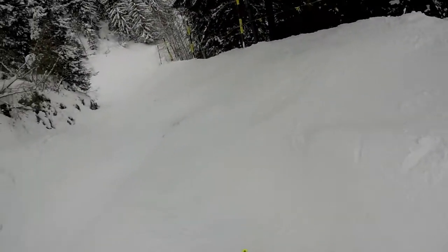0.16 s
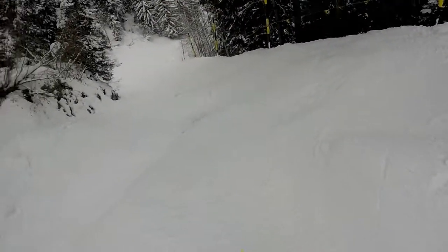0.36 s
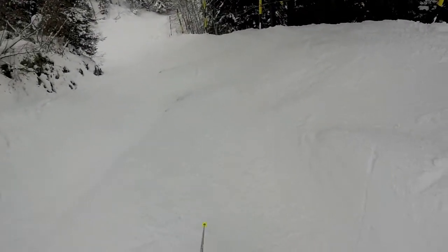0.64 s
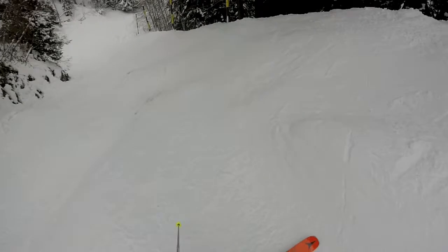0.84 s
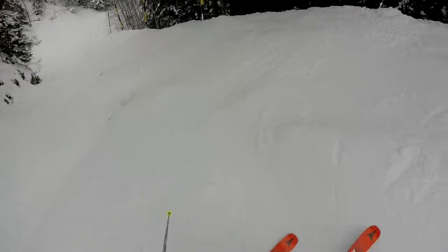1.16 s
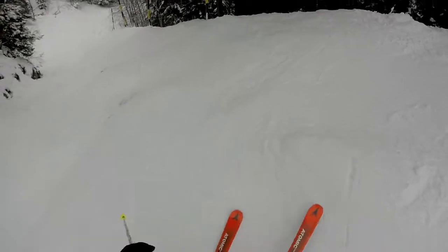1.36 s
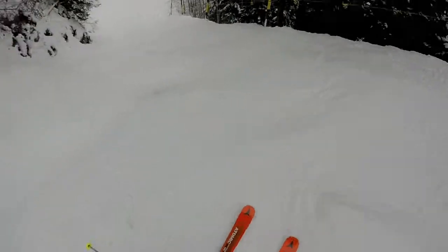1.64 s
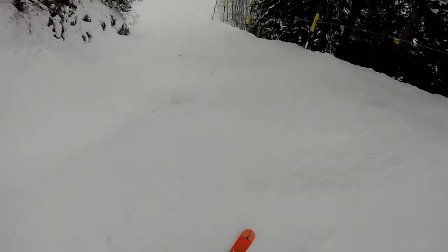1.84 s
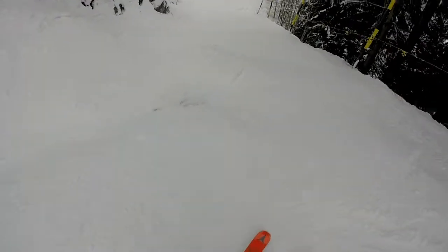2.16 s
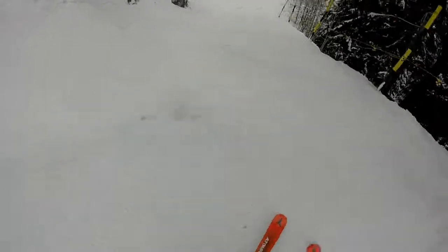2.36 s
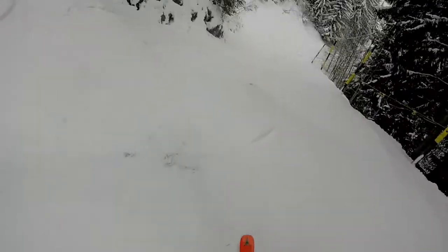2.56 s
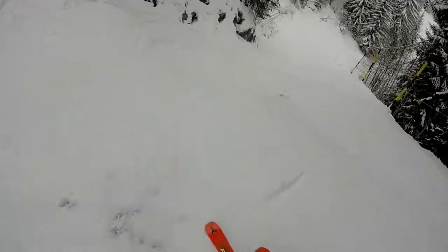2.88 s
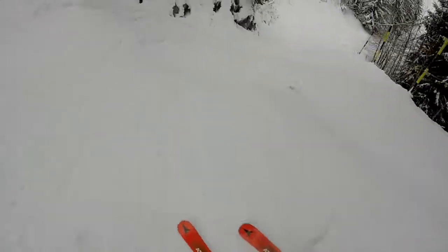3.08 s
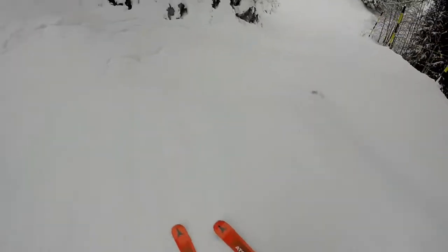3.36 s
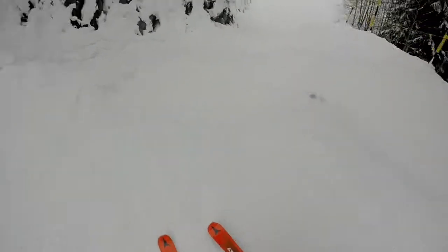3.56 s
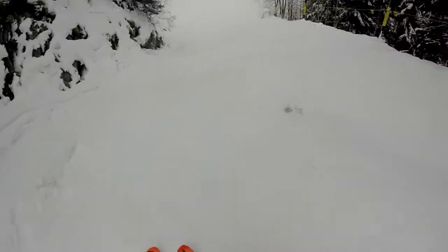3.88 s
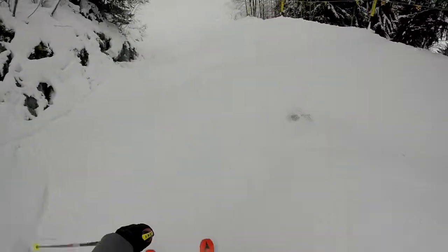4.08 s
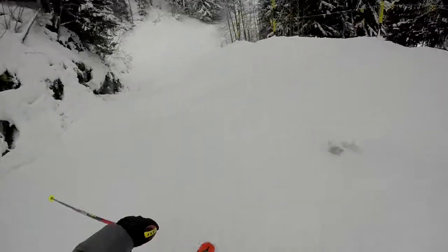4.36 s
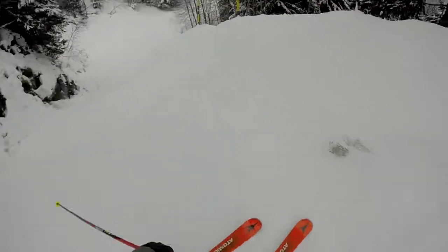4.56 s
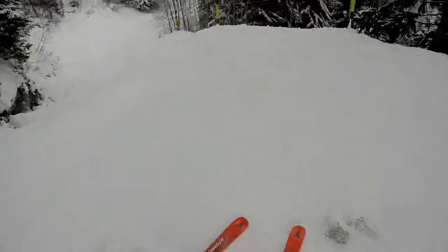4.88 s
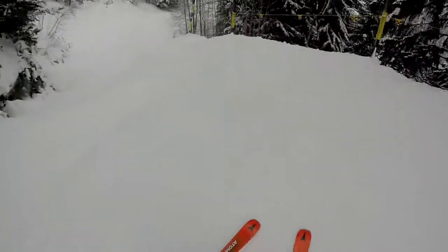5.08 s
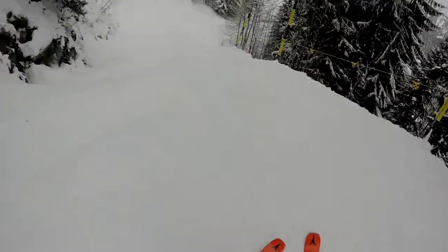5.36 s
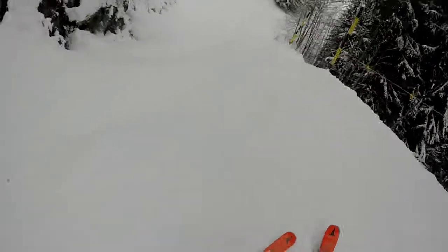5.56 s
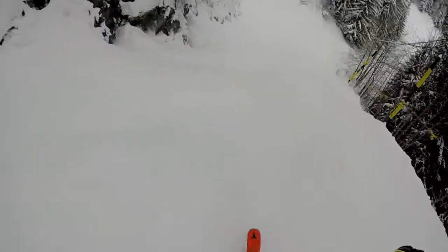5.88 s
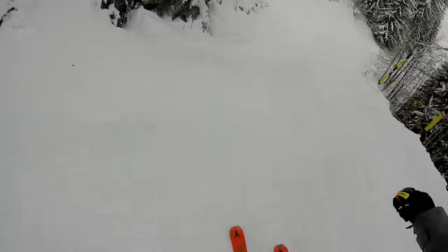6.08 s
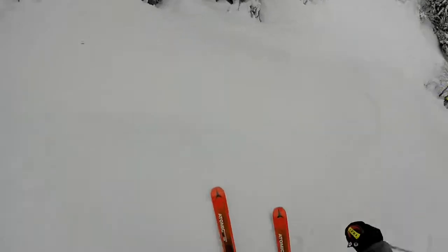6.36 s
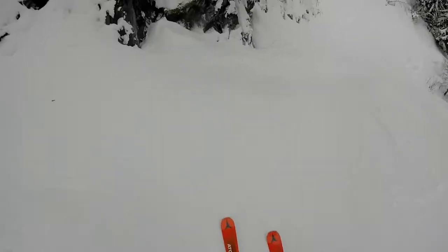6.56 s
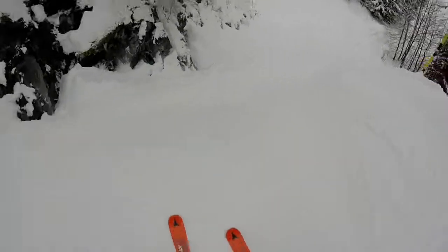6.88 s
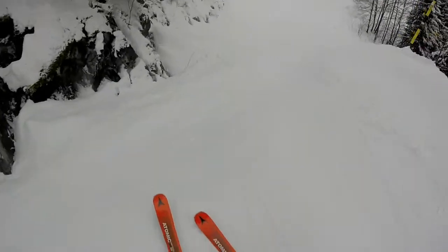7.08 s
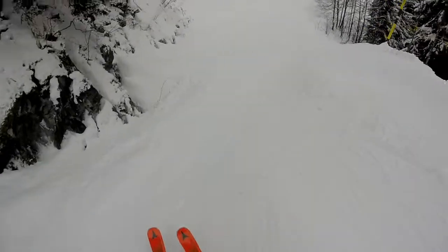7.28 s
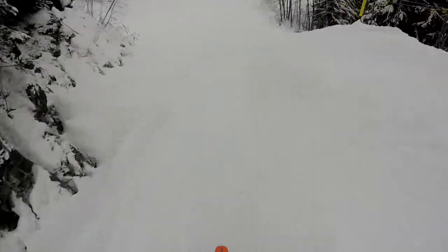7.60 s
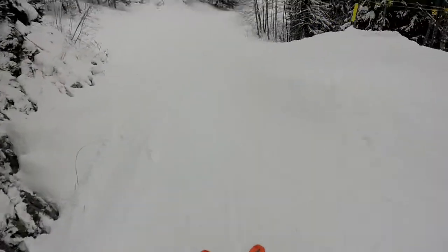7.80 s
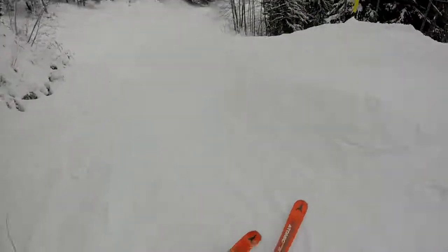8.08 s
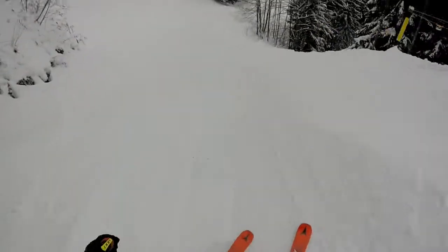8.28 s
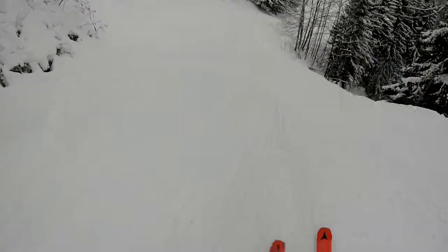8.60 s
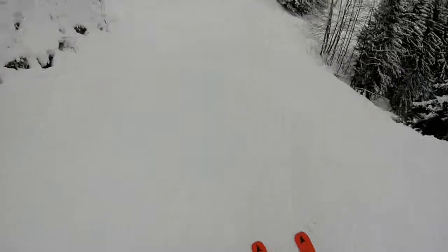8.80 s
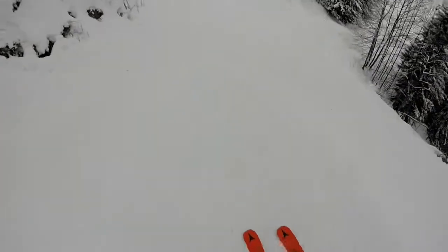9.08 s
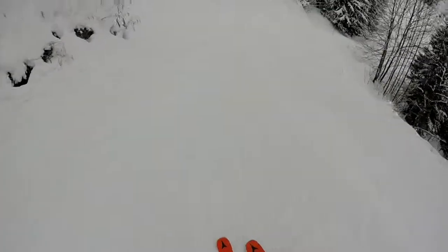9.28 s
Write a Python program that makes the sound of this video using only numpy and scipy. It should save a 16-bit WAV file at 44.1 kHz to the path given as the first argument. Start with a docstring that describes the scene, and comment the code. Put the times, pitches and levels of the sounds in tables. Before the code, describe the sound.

Close, boxy sound of skiing outdoors: short bursts of hissing snow spray between softer gliding, while the shaking camera mount flutters and rumbles very low. The start is quiet, with a faint sliding moan. Knocks and dull clacks follow near 2.7, 4.4 and 6.6 seconds. Deep thumps jolt the microphone around 6.3 and strongest at 7.7 seconds with clustered ticks, then strong swishes and more rumble close it.

```python
"""Snow swishes under skis gliding down a soft slope, gear ticks, and a deep rumble thumps at every bump.
The microphone sits shut inside a small plastic camera housing on a shaking mount.
Swish, ticks and rushing air are noise and clicks through the housing's resonances; the mount adds
low noise bands and short pulses. Clacks ring by themselves; a soft moan is sliding noise bands."""
import sys
import numpy as np
from scipy import signal
from scipy.fft import rfft, irfft
from scipy.io import wavfile
from scipy.ndimage import uniform_filter1d

SR = 44100
rng = np.random.default_rng(int(sys.argv[2]) if len(sys.argv) > 2 else 0)


def wav_out(sig):
    """Save sig, one row per channel (or a flat mono array), as 16-bit PCM at SR to the path in sys.argv[1]."""
    wavfile.write(sys.argv[1], SR, np.round(np.clip(np.atleast_2d(sig).T, -1, 1) * 32767).astype(np.int16))


N = 416304


def from_db(db):
    """Decibels to gain."""
    return 10 ** (np.asarray(db) / 20)


def rms_one(x):
    """Scale to unit rms."""
    return x / np.sqrt(np.mean(x ** 2) + 1e-20)


def in_time(rows):
    """Columns of a curve table, one value per sample."""
    start_s, *columns = np.transpose(rows)
    return [np.interp(np.arange(N) / SR, start_s, column) for column in columns]


def drift(rate_hz):
    """Slow chance with spread 1: noise through two equal poles, made at every 40th sample."""
    step = 40
    r = np.exp(-2 * np.pi * rate_hz * step / SR)
    noise = rng.standard_normal(N // step + 2002)
    slow = signal.lfilter([1], [1, -2 * r, r * r], noise)[2000:]   # drop the settling
    return np.interp(np.arange(N) / step, np.arange(len(slow)), rms_one(slow))


def resonance(x, hz, width_hz):
    """Two-pole resonance with gain 1 on top."""
    r = np.exp(-np.pi * width_hz / SR)
    poles = [1, -2 * r * np.cos(2 * np.pi * hz / SR), r * r]
    return signal.lfilter([(1 - r * r) / 2, 0, (r * r - 1) / 2], poles, x)


def bandpass(x, order, band_hz):
    """Butterworth band filter."""
    return signal.sosfilt(signal.butter(order, band_hz, "band", fs=SR, output="sos"), x)


# lower and upper resonances of the housing: pitch_hz [Hz], width_hz [Hz], level_db [dB]
LOW_MODES = [(417, 370, -13), (1028, 71, 3.5), (1266, 131, 4.5), (1600, 297, 4), (2325, 262, 2.5),
             (3040, 330, -7.5)]
HIGH_MODES = [(3333, 226, -2), (4313, 410, 2.5), (4960, 230, 4.5), (5410, 670, -5), (6480, 1160, -13),
              (8250, 240, -19.5), (11000, 2100, -31.5)]


def housing(x, modes, patchy_db):
    """Parallel resonances of alternating sign, fed a little unevenly as the source moves about."""
    out = 0
    for k, (hz, width_hz, db) in enumerate(modes):
        gain = from_db(db + patchy_db * drift(17.8))
        out = out + (-1) ** k * gain * resonance(x, hz, width_hz)
    return out


def crystals(per_s, spread_db, hiss):
    """Snow crystals breaking at random, on a smooth hiss."""
    sizes = from_db(spread_db * np.minimum(rng.exponential(1, N), 5)) * rng.choice([-1, 1], N)
    breaks = sizes * (rng.random(N) < per_s / SR)
    return rms_one(breaks) + hiss * rng.standard_normal(N)


# spectrum of air and electronics at the microphone: pitch_hz [Hz], shape_db [dB, relative]
FLOOR_SHAPE = [(88, -67), (150, 7), (668, -4.5), (2310, -14), (3830, -14.5), (4930, -22), (5440, -18.5),
               (11800, -27), (15500, -42)]
# faint electronic tones: pitch_hz [Hz], level_db [dB rms]
WHINES = [(8032, -95), (10070, -94), (12048, -90), (12107, -94)]


def floor():
    """Steady soft noise, and electronics whining as sines with a wandering phase."""
    hz, db = np.transpose(FLOOR_SHAPE)
    shape_db = np.interp(np.log(np.fft.rfftfreq(N, 1 / SR) + 1), np.log(hz), db)
    noise = rms_one(irfft(rfft(rng.standard_normal(N)) * from_db(shape_db), N))
    t = np.arange(N) / SR
    whine = 0
    for hz, db in WHINES:
        phase = 2 * np.pi * hz * t + 0.39 * drift(3)
        whine = whine + from_db(db) * np.sqrt(2) * np.sin(phase)
    return from_db(-59) * noise + whine


# air rushing past, before the spray sways it: start_s [s], level_db [dB]
AIR = [(0.0, -77), (0.9, -75), (1.7, -70.5), (2.4, -67), (3.2, -64.5), (4.0, -68.5), (4.35, -63.5),
       (4.75, -63), (5.1, -66), (5.8, -65), (6.4, -68.5), (7.1, -66), (7.5, -70), (8.2, -63), (8.9, -70.5),
       (9.44, -65.5)]
# resonances of the housing for the topmost hiss: pitch_hz [Hz], width_hz [Hz], level_db [dB]
AIR_MODES = [(6300, 880, 3), (8940, 750, 2.5), (10900, 1460, -3), (14900, 1500, -13)]
AIR_FOLLOWS = 0.57   # share of the spray's swing in dB


def air(fine_db):
    """Smooth high hiss with a few fine crystals in it; it swells with the spray."""
    hiss = rms_one(housing(crystals(2700, spread_db=4.0, hiss=3.1), AIR_MODES, patchy_db=0.3))
    spray_swing_db = fine_db - fine_db.mean()
    level_db = in_time(AIR)[0] + AIR_FOLLOWS * spray_swing_db + 2.0 * drift(25)
    return from_db(level_db) * hiss


# shaking of the mount between bumps: start_s [s], sway_db [dB], judder_db [dB]
SHAKE = [(0.0, -38.5, -61), (0.32, -46, -60.5), (0.5, -38, -52), (0.7, -32.5, -51.5), (1.4, -41.5, -67),
         (1.64, -31, -74), (1.95, -40.5, -58), (2.04, -29.5, -65), (2.2, -42, -55), (2.5, -27.5, -55),
         (2.7, -20.5, -44), (2.84, -26.5, -50), (2.96, -24, -39), (3.1, -29.5, -72), (3.64, -39, -68),
         (3.98, -29, -62), (4.14, -40.5, -58), (4.4, -17.5, -64), (4.53, -18.5, -60), (4.58, -26.5, -66),
         (4.78, -25, -76), (5.14, -37.5, -67), (5.9, -36.5, -58.5), (6.6, -25, -60), (7.3, -40.5, -55),
         (7.6, -35.5, -57.5), (7.9, -18.5, -48), (8.1, -29.5, -59), (8.4, -25, -63), (8.5, -41, -58),
         (8.8, -30.5, -52), (9.05, -15, -55), (9.15, -21, -64), (9.22, -37.5, -45.5), (9.44, -32.5, -58)]
# band of the mount rocking: low_hz [Hz], high_hz [Hz]
SWAY_BAND = (19.06, 34.5)
ROCK_DB, ROCK_JUDDER_DB = -12, -42   # sway and judder set off by a bump, against its level
ROCK_RISE_S, ROCK_DB_PER_S = 0.025, 80   # time to rise by 20 dB before the bump; decay after it
SWAY_EVENNESS, SWAY_MEMORY_S = 0.3, 0.08   # how far chance swells are held down, over what time


def rumble():
    """The mount rocks slowly and judders in lumps, both lifted to a minimum level around each bump."""
    (sway_db, judder_db), t = in_time(SHAKE), np.arange(N) / SR
    for s, db, *_ in BUMPS:
        jolt_db = db - np.maximum(ROCK_DB_PER_S * (t - s), 20 * (s - t) / ROCK_RISE_S)
        sway_db = np.maximum(sway_db, jolt_db + ROCK_DB)
        judder_db = np.maximum(judder_db, jolt_db + ROCK_JUDDER_DB)
    sway = bandpass(rng.standard_normal(N), 2, SWAY_BAND)
    recent_power = uniform_filter1d(sway ** 2, round(SWAY_MEMORY_S * SR))
    sway = rms_one(sway / recent_power ** (SWAY_EVENNESS / 2))
    judder = rms_one(bandpass(rng.standard_normal(N), 2, [55, 110]))
    shared_gain = from_db(1.37 * drift(7.9))
    lumpy_db = judder_db + 5.5 * drift(6.1)
    return shared_gain * (from_db(sway_db) * sway + from_db(lumpy_db) * judder)


# heavy bumps that jolt the mount: start_s [s, centre], level_db [dB], pitch_hz [Hz], half_s [s]
BUMPS = [(4.451, -13.5, 39.2, 0.0052), (6.132, -8.5, 40.28, 0.019), (6.3593, 0, 39, 0.0071),
         (7.6825, 1.2, 40.7, 0.012), (7.817, -9, 40, 0.0069), (8.929, -14.5, 44, 0.012)]
# short knocks of the mount against its stop: start_s [s, centre], level_db [dB peak]
KNOCKS = [(2.689, -21), (2.743, -21.5), (2.973, -22), (4.454, -24), (4.483, -24), (5.985, -26.5),
          (6.128, -14.5), (6.35, -21), (6.43, -18.5), (6.628, -21), (6.781, -29), (7.667, -23), (7.696, -5),
          (7.7375, -12), (8.122, -28), (8.701, -25.5), (8.921, -32), (8.942, -16)]
BUMP_LEAN = 1.4   # radians: the downswing is the deeper one
KNOCK_HZ, KNOCK_RISE_S, KNOCK_DECAY_S = 120, 0.0025, 0.0041


def bumps():
    """Soft pushes swing down and back up under a smooth swell; knocks rise fast and ring out."""
    out, t = np.zeros(N), np.arange(-SR // 16, SR // 16) / SR
    for s, db, hz, half_s in BUMPS:
        at = round(s * SR) - SR // 16
        swell = np.exp(-(t / half_s) ** 2)
        out[at:at + len(t)] += from_db(db) * swell * np.sin(2 * np.pi * hz * t - BUMP_LEAN)
    rise_or_decay = np.where(t < 0, -(t / KNOCK_RISE_S) ** 2, -np.abs(t) / KNOCK_DECAY_S)
    knock = np.exp(rise_or_decay) * np.cos(2 * np.pi * KNOCK_HZ * t)
    for s, db in KNOCKS:
        at = round(s * SR) - SR // 16
        out[at:at + len(t)] += from_db(db) * knock
    return out


# the mount is pulled tight and lets go: start_s [s, peak], level_db [dB peak], pull_s [s], release_s [s]
SNAP = (7.6826, -11, 0.003, 0.0004)


def snap():
    """A short downward pull that ends abruptly: an exponential rise and a far quicker fall."""
    s, db, pull_s, release_s = SNAP
    t = np.arange(N) / SR - s
    return -from_db(db) * np.exp(-np.abs(t) / np.where(t < 0, pull_s, release_s))


# hard clacks of a pole on gear: start_s [s], level_db [dB, before the parts]
CLACKS = [(2.6848, -18), (4.4356, -21), (6.6231, -14)]
# bright snap and duller rebound: delay_s [s], pitch_hz [Hz], width_hz [Hz], level_db [dB]
CLACK_PARTS = [(0, 2150, 950, -7), (0.0012, 1250, 600, -10), (0.0018, 2600, 900, -12), (0.0, 700, 450, -17),
               (0.005, 1500, 550, -21)]


def clacks():
    """Every clack rings the same short snap and rebound, each part a click through two resonances."""
    out = 0
    for delay_s, hz, width_hz, part_db in CLACK_PARTS:
        clicks = np.full(N, 1e-18)
        for s, db in CLACKS:
            clicks[round((s + delay_s) * SR)] = from_db(db + part_db) * SR / width_hz
        out = out + resonance(resonance(clicks, hz, width_hz), hz, width_hz)
    return signal.sosfilt(signal.butter(6, 3100, fs=SR, output="sos"), out)


# a soft moan: start_s [s], pitch_hz [Hz], level_db [dB, before the bands]
MOAN = [(0.4, 1208, -75), (0.44, 1180, -46.5), (0.5, 1155, -51), (0.58, 1077, -49), (0.65, 1127, -52.5),
        (0.71, 1198, -64), (0.79, 1273, -70), (0.95, 1236, -48), (1.05, 1255, -68)]
# its bands: multiple [of the pitch], width_hz [Hz], level_db [dB]
MOAN_BANDS = [(1.0, 48, -4), (2.02, 100, -7)]
# a thin hiss that comes with it: pitch_hz [Hz], width_hz [Hz], level_db [dB]
MOAN_HISS = (5620, 330, -20)


def moan():
    """A soft moan: narrow noise bands ride on a sliding pitch; a thin hiss follows the same level curve."""
    hz, db = in_time(MOAN)
    phase = 2 * np.pi * np.cumsum(hz) / SR
    bands = 0
    for multiple, width_hz, band_db in MOAN_BANDS:
        in_step = drift(width_hz) * np.cos(multiple * phase)
        quarter_turn = drift(width_hz) * np.sin(multiple * phase)
        bands = bands + from_db(band_db) * (in_step + quarter_turn)
    hiss_hz, width_hz, hiss_db = MOAN_HISS
    hiss = resonance(resonance(rng.standard_normal(N), hiss_hz, width_hz), hiss_hz, width_hz)
    return from_db(db) * (bands + from_db(hiss_db) * rms_one(hiss))


# ticks of poles and gear: start_s [s], level_db [dB, before the housing], brightness_db [dB]
TICKS = [(1.111, -47, 0.5), (1.18, -34, -19), (1.898, -47.5, 4.5), (2.695, -21.5, -36), (3.163, -26.5, -27),
         (3.333, -34, -8), (3.478, -55, 7), (4.945, -34, -10), (4.986, -34, -8), (5.25, -39, -7),
         (5.979, -31.5, -28), (6.011, -36, -8), (6.055, -31, -23), (6.127, -46, -26), (6.23, -31, -15),
         (6.349, -25.5, -32), (6.539, -31.5, -13), (6.612, -33, -5), (6.976, -61, 9), (7.29, -59.5, 10.5),
         (7.299, -63, 8), (7.652, -25, -17), (7.669, -22.5, -24), (7.675, -30, -4.5), (7.682, -22, -19),
         (7.688, -27, -17), (7.694, -17.5, -29), (7.702, -26, -22), (8.858, -29, -21), (9.21, -36, -15)]
# longer crunches of crust under a ski: start_s [s], level_db [dB, before the housing], brightness_db [dB]
CRUNCHES = [(0.234, -35, -14), (0.66, -42, -20), (1.596, -35, -6), (1.762, -43, -19), (2.608, -29, -17),
            (3.094, -34, -10), (4.922, -25.5, -7), (6.18, -20.5, -8.5), (7.661, -42, 2), (8.132, -36, -15),
            (8.161, -38, 2.5), (8.971, -35, -1), (9.151, -50, 3)]
TICK_S, CRUNCH_S, CRUNCH_RISE_S = 0.0034, 0.01, 0.001


def ticks():
    """A snap and a dying burst of noise ring the housing; crunches last longer, the brightest reach the top."""
    dull, bright, top = np.full((3, N), 1e-18)
    t = np.arange(2048) / SR
    noise = rng.standard_normal((len(TICKS + CRUNCHES), 2, len(t)))
    noise[:len(TICKS), :, 0] = 8.3   # the snap: one strong first sample
    noise[len(TICKS):] *= 1 - np.exp(-t / CRUNCH_RISE_S)
    lengths_s = [TICK_S] * len(TICKS) + [CRUNCH_S] * len(CRUNCHES)
    for (s, db, brightness_db), length_s, burst in zip(TICKS + CRUNCHES, lengths_s, noise):
        low, high = burst * np.exp(-(t / length_s) ** 2) * from_db(db)
        at = round(s * SR)
        near = slice(at, at + len(t))
        dull[near] += low
        bright[near] += high * from_db(brightness_db)
        top[near] += high * from_db(2 * brightness_db)
    dull = bandpass(dull, 6, [480, 3100])
    low_ring = from_db(-1.5) * housing(dull, LOW_MODES, 0) + from_db(-13.0) * dull
    high_ring = from_db(6.0) * housing(bright, HIGH_MODES, 0)
    return low_ring + high_ring + from_db(-12.0) * housing(top, AIR_MODES, 0)


CRACKLE_PER_S, CRACKLE_DB, CRACKLE_S = 70, -9, 0.002   # rate; level against the swish; time to peak


def lumps():
    """Gain of the swish: brief swells where small lumps of crust break."""
    r = np.exp(-1 / (CRACKLE_S * SR))
    hits = (rng.random(N) < CRACKLE_PER_S / SR) * np.minimum(rng.exponential(1, N), 2.5)
    swells = signal.lfilter([(1 - r) * np.e], [1, -2 * r, r * r], hits)
    return 1 + from_db(CRACKLE_DB) * swells


# steady slide of the skis between swishes: start_s [s], level_db [dB], brightness_db [dB]
GLIDE = [(0.0, -58.5, -8), (0.36, -65, -7.5), (0.62, -61.5, -2), (0.8, -60, -5), (1.15, -63, -5),
         (1.45, -60, -2), (2.08, -62.5, -4), (2.45, -57.5, -6.5), (2.8, -53.5, -3.5), (3.25, -56.5, -0.5),
         (3.64, -57.5, -3.5), (3.99, -66.5, -3.5), (4.3, -57, -8.5), (4.65, -52, 1.5), (5.0, -57.5, -3),
         (5.2, -59, -1.5), (5.69, -58.5, 0), (5.76, -69.5, -5), (6.15, -52.5, -4.5), (6.57, -55.5, -5),
         (6.9, -55.5, -4.5), (7.4, -63, -4), (7.65, -48.5, -10), (8.5, -57, -3), (8.76, -61, -7.5),
         (8.9, -51.5, -0.5), (9.44, -58, -8.5)]
# an edge bites and throws up snow:
# start_s [s], length_s [s], level_db [dB], brightness_db [dB], change_db [dB over its length]
SWISHES = [(0.379, 0.33, -51.5, -13.5, -6), (0.63, 0.16, -59, -6, 11), (0.742, 0.28, -50.5, -1, 2),
           (1.06, .05, -53.5, -10, -6), (1.173, 0.13, -58, -4, 1), (1.586, 0.13, -45.5, -2, -9.5),
           (1.715, 0.21, -52, -6, -8.5), (1.952, 0.057, -52, -7, -7), (2.142, 0.18, -53, -6.5, -5),
           (2.558, 0.055, -44.5, -12, -2), (2.837, 0.21, -47, -2, -0.5), (3.083, 0.12, -47.5, -0.5, -3),
           (3.302, 0.054, -53, -4, 1.5), (4.25, 0.013, -48, -4, 1), (4.311, 0.28, -51.5, -5.5, -8),
           (4.558, 0.1, -49.5, -2, -2.5), (4.747, 0.14, -51.5, -4, -3), (6.233, 0.12, -50.5, -0.5, 2),
           (6.368, 0.11, -42.5, -5.5, -0.5), (6.628, 0.13, -41, -4.5, -5.5), (6.767, 0.049, -51, -5, -5),
           (7.003, 0.24, -55, -4.5, -0.5), (7.722, 0.24, -45, -5, -4.5), (7.969, 0.09, -46.5, -2, 1),
           (8.077, 0.12, -44, -7, 3), (8.203, 0.2, -56.5, -4.5, 3), (8.548, 0.15, -46, -1.5, -6),
           (8.864, 0.059, -47, -3.5, 0.5), (8.942, 0.18, -44.5, -4, -7.5), (9.133, 0.21, -49, -9, -4)]
ATTACK_S, RELEASE_S, SPRAY_ATTACK_S = 0.032, 0.042, 0.03


def slide():
    """Levels in dB of coarse swish and fine spray: the swishes add in power to the steady slide."""
    level_db, brightness_db = in_time(GLIDE)
    power = from_db(2 * np.array([level_db, level_db + brightness_db]))
    t = np.arange(N) / SR
    for s, length_s, db, bright_db, change_db in SWISHES:
        near = slice(round(s * SR), round((s + length_s + RELEASE_S) * SR))
        since = t[near] - s
        corners_s = [0, ATTACK_S, length_s, length_s + RELEASE_S]
        shape = np.interp(since, corners_s, [0, 1, from_db(change_db), 0])
        spray_lag = np.minimum(since / SPRAY_ATTACK_S, 1)
        shapes = shape * [np.ones_like(shape), spray_lag]
        power[:, near] += (shapes * from_db([[db], [db + bright_db]])) ** 2
    return 10 * np.log10(power)


def skis(coarse_db, fine_db):
    """Coarse swish and fine spray, crystals ringing the housing, share the same uneven slipping."""
    slip_db = 0.51 * drift(19) + 0.36 * drift(130) + 1.0 * drift(19.0)
    coarse = rms_one(housing(crystals(900, spread_db=5.5, hiss=2.95), LOW_MODES, patchy_db=2.0))
    fine = rms_one(housing(crystals(3000, spread_db=2.5, hiss=1.87), HIGH_MODES, patchy_db=1.45))
    swish = from_db(coarse_db) * coarse + from_db(fine_db) * fine
    return from_db(slip_db) * lumps() * swish


# where two paths into the housing cancel: pitch_hz [Hz], width_hz [Hz]
NOTCH = (5360, 130)


def scene():
    """Everything that reaches the microphone: notched airborne sound and the shaking of the mount."""
    coarse_db, fine_db = slide()
    airborne = floor() + air(fine_db) + clacks() + moan() + ticks() + skis(coarse_db, fine_db)
    airborne = airborne - 0.61 * resonance(airborne, *NOTCH)
    mount = rumble() + bumps() + snap()
    return (airborne + mount)[None]   # one channel


def record(dry):
    """Subsonics are blocked, peaks beyond full scale clip, and the top is cut steeply."""
    x = signal.sosfilt(signal.butter(2, 18, "high", fs=SR, output="sos"), dry)
    top_cut = signal.ellip(12, 0.1, 70, 15250, fs=SR, output="sos")   # ripple dB, rejection dB, Hz
    return signal.sosfilt(top_cut, np.clip(x, -1, 1))


dry = scene()
out = record(dry)
wav_out(out)
```